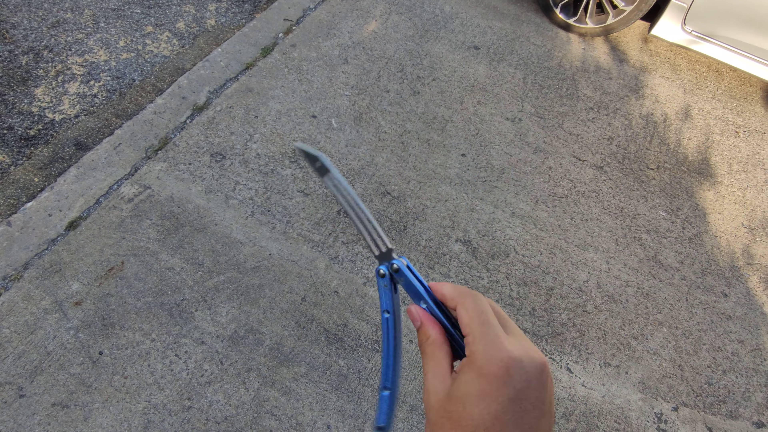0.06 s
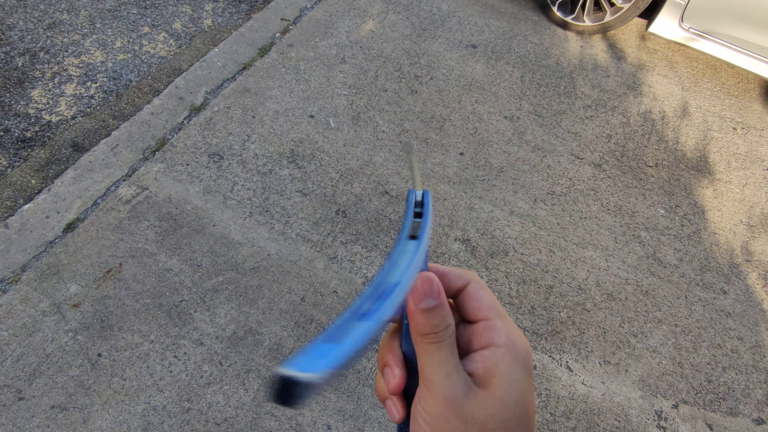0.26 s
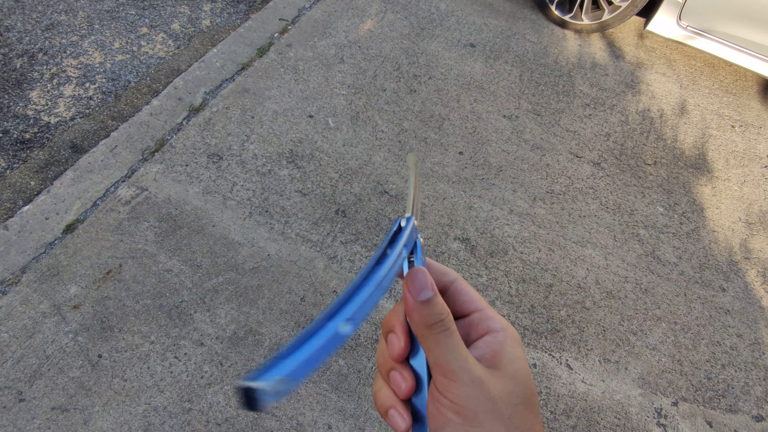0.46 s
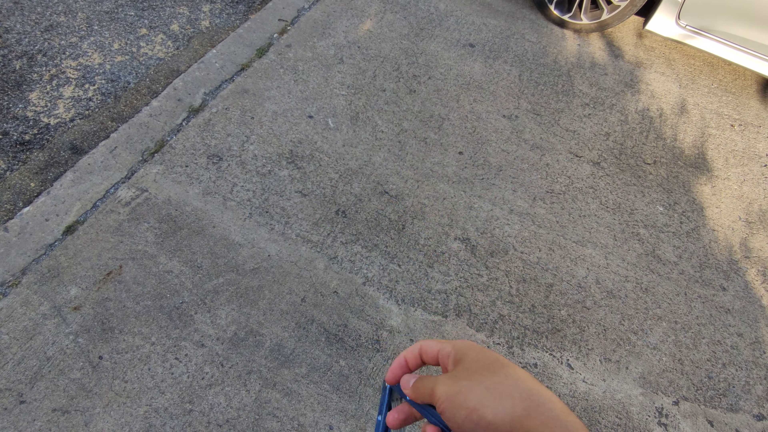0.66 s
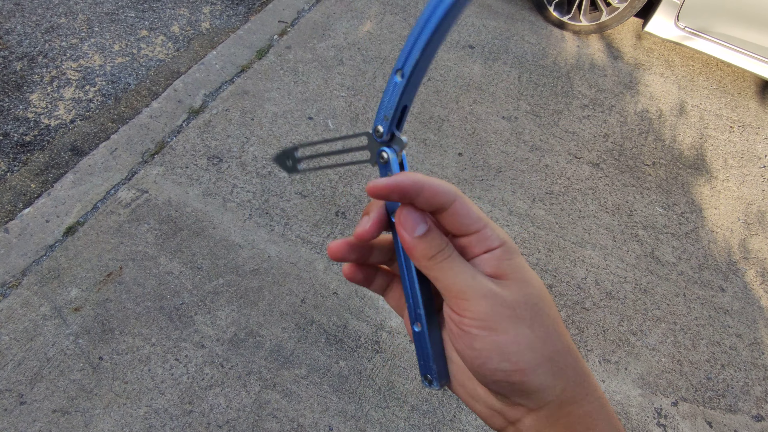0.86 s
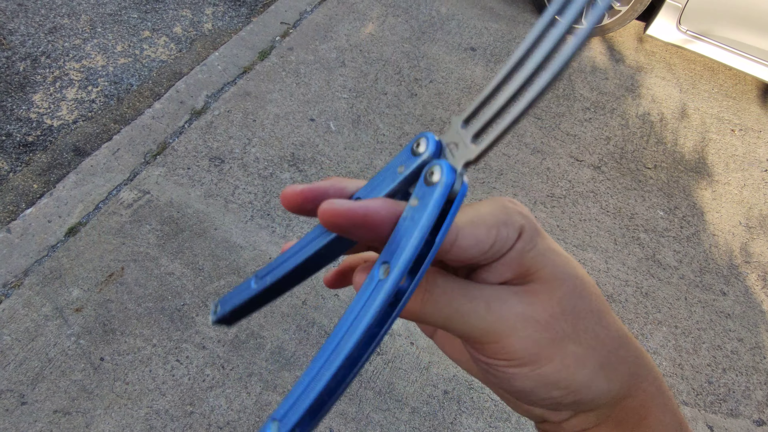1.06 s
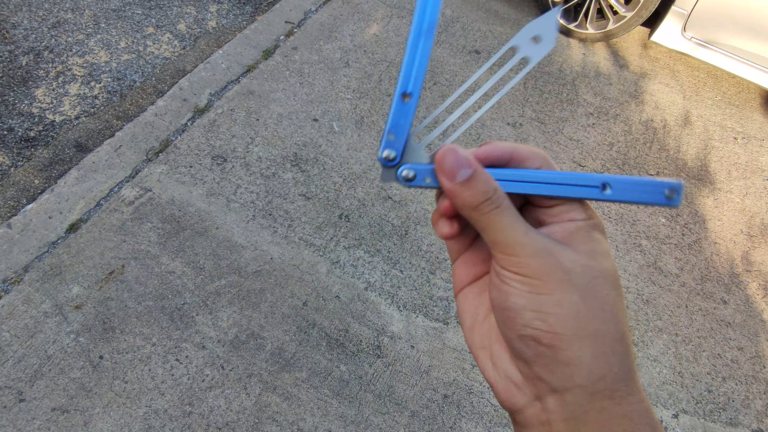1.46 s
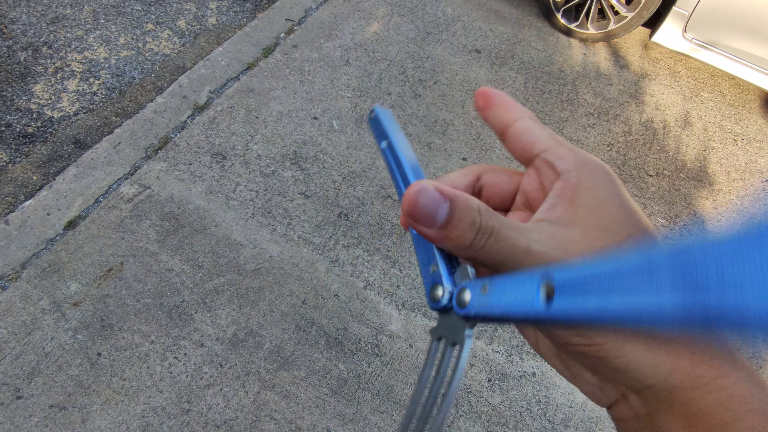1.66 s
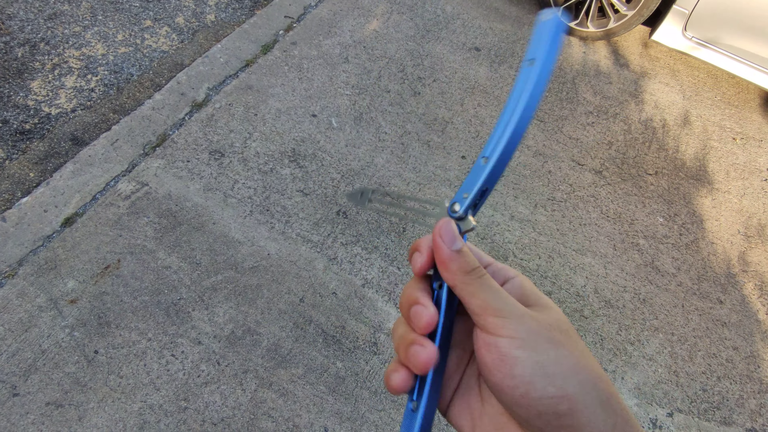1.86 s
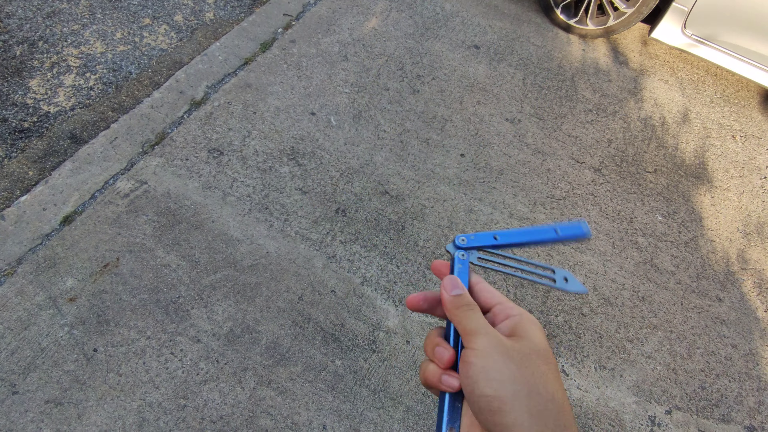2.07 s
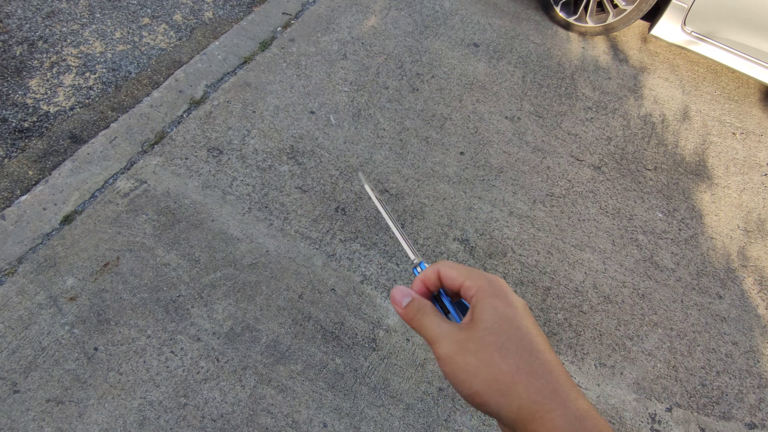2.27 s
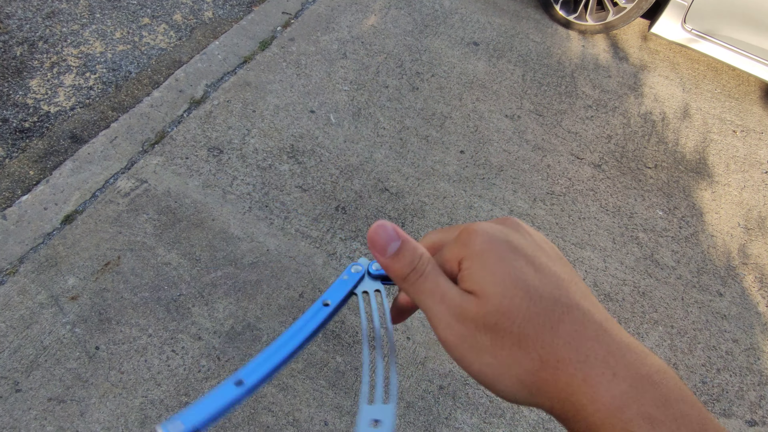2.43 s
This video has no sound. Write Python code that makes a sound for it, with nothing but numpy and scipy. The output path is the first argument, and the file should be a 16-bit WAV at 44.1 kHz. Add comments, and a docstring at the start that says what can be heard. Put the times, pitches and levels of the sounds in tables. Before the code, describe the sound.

Sharp, close clacks come from a practice butterfly knife swung by hand in the open air. After several hits with light ringing, a pass makes a low puff, and more clacks end it. Soft wind rumbles throughout.

```python
"""A butterfly knife trainer is flipped close to the microphone, outdoors, over a low rumble of wind.
For about a second its handles clack on each other and on the pins; hard catches thud in the palm and
the free blade rings on as it swings. A thin hiss swells, and at 1.5 s one pass pushes a puff of air at
the microphone. From 2 s comes a last flurry of clacks with a faint squeak, then the thin hiss falls
away and a softer rush of air comes up."""
import sys
import numpy as np
from scipy import signal
from scipy.fft import rfft, irfft, next_fast_len
from scipy.io import wavfile
from scipy.ndimage import uniform_filter1d, map_coordinates

SR = 44100
rng = np.random.default_rng(int(sys.argv[2]) if len(sys.argv) > 2 else 0)


def generate_wav(signal):
    """Clip the signal to [-1, 1] and save it as 16-bit WAV at the path in sys.argv[1]."""
    frames = np.transpose(np.atleast_2d(signal))
    scaled = np.clip(frames, -1, 1) * 32767
    pcm = np.round(scaled).astype(np.int16)
    wavfile.write(sys.argv[1], SR, pcm)


N = 114660  # 2.6 s


def amp(db):
    """Decibels to gain."""
    return 10 ** (np.asarray(db) / 20)


def unit(x):
    """Scale to rms 1."""
    return x / np.sqrt(np.mean(x ** 2) + 1e-20)


def eq_gain(spectrum, hz):
    """Gain at hz from (Hz, dB) points joined on a log frequency axis."""
    points_hz, points_db = np.transpose(spectrum)
    return amp(np.interp(np.log(hz + 1), np.log(points_hz + 1), points_db))


def fader(points):
    """Gain per sample from (s, dB) points."""
    return amp(np.interp(np.arange(N) / SR, *np.transpose(points)))


def wobble(rate):
    """A smooth random curve, rate knots a second."""
    knots = rng.standard_normal(int(N * rate / SR) + 4)
    return map_coordinates(knots, [np.arange(N) * rate / SR])


def filtered(x, response):
    """Filter x by a gain given as a function of Hz."""
    size = next_fast_len(N + SR // 2)
    return irfft(rfft(x, size) * response(np.fft.rfftfreq(size, 1 / SR)), size)[:N]


def noise(spectrum):
    """Coloured noise of rms 1."""
    return unit(filtered(rng.standard_normal(N), lambda hz: eq_gain(spectrum, hz)))


def impact(spectrum, size=8192):
    """The tightest causal pulse with this spectrum (minimum phase)."""
    cepstrum = irfft(np.log(eq_gain(spectrum, np.fft.rfftfreq(size, 1 / SR))))
    cepstrum[1:size // 2] *= 2
    cepstrum[size // 2 + 1:] = 0
    return irfft(np.exp(rfft(cepstrum)))


def clack(spectrum, t60, rattle_db, pitch=1):
    """One metal impact and its rattle, which is rattle_db stronger and dies in t60 seconds."""
    pulse = impact([(hz * pitch, db) for hz, db in spectrum])
    t = np.arange(len(pulse)) / SR
    rattle = rng.standard_normal(len(t)) * amp(-60 * t / t60)
    hit = rfft(pulse) * (1 + amp(rattle_db) * rfft(rattle / np.linalg.norm(rattle)))
    in_band = irfft(hit * (np.fft.rfftfreq(len(t), 1 / SR) < MIC_EDGE_HZ))
    return irfft(hit) / np.linalg.norm(in_band) * np.sqrt(SR / 2000)  # in-band energy: 0.5 ms at rms 1


# Metal hitting metal. Each row: start in seconds, snap, knock and crack levels in dB,
# snap and knock pitch ratios, low and high ring levels in dB.
CONTACTS = [(0.1477, -30, -43, -35, 1.1, 1.02, -64, -57), (.1503, -21.5, -33, -44, 1.02, 0.91, -58, -56),
            (.1550, -33.5, -40.5, -50, 1.0, 1.0, -55, -59), (.2934, -14.5, -42, -34, .98, 1.4, -55, -48),
            (.2944, -10.5, -27, -20.5, 0.92, 1.2, -36.5, -31),
            (.2968, -22.5, -24.5, -33, 1.1, 1.14, -53, -46),
            (.3008, -34.5, -36.5, -40, 0.7, 1.14, -45.5, -48), (.5060, -65, -71, -75, 1.2, 1.1, -78, -59),
            (.7145, -55, -41.5, -59, 0.72, 1.01, -64, -59), (0.7207, -45.5, -54, -64, 1.03, 1.2, -65, -64),
            (.8358, -21, -35, -43, 1.02, 1.05, -51, -62), (.8420, -40, -54, -49, 1.5, 1.0, -64, -50),
            (1.1024, -26, -29.5, -45, 1.06, 0.91, -62, -45),
            (1.1046, -17, -30.5, -42, 1.07, 1.14, -49, -37),
            (1.115, -33.5, -36, -54, 0.99, 0.9, -50.5, -62), (2.015, -41.5, -52, -63, 1.1, 1.3, -64, -58),
            (2.0806, -20, -26.5, -37, .99, 0.94, -55, -51), (2.0826, -24, -28.5, -47, .98, 0.94, -53, -57),
            (2.0850, -20, -43, -42, .99, 1.3, -53, -52), (2.1158, -35.5, -44, -59, .99, 1.17, -49.5, -51),
            (2.3036, -20, -37, -45, 0.9, 1.2, -51, -58), (2.3055, -14.5, -31, -54, 1.02, 1.04, -36.5, -47),
            (2.317, -35.5, -39, -50, 0.87, 0.91, -55, -43)]
# The colours of a hit: bright snap, mid knock, broad crack. Each row: frequency in Hz, level in dB.
SNAP_EQ = [(3000, -52), (4300, -33.5), (5100, -20.5), (5500, -17.5), (5750, -10), (6150, -1.5),
           (6600, -4.5), (7000, -1.5), (7400, 7), (8000, -5.5)]
KNOCK_EQ = [(150, -31.5), (600, -16.5), (1100, -26), (1600, -20), (1950, -7), (2350, 5), (2750, -3),
            (3250, -7), (3600, -11.5), (4500, -31), (7000, -39)]
CRACK_EQ = [(150, -10), (600, 1), (1100, -7), (1500, -5.5), (1950, -6), (2500, -4.5), (3700, -2.5),
            (4400, -5.5), (5400, 10), (7000, 0.5)]
# Handle modes, damped by the hand. Each row: pitch in Hz, level in dB, 60 dB decay time in seconds.
HANDLE_MODES = [(2290, -3, .09), (2360, 2, .08), (2505, -7, .05), (2710, -6, .055), (2938, -8, .055),
                (3104, -10, .06), (3400, -14, .04), (6872, 1, .06), (7160, -9, .04), (7480, -5, .09)]


def handles():
    """Each contact with a handle or pin snaps, knocks, cracks and briefly rings the handles."""
    out, t = np.zeros(N), np.arange(SR // 4) / SR
    for start, snap_db, knock_db, crack_db, snap_pitch, knock_pitch, low_db, high_db in CONTACTS:
        add(out, start, amp(snap_db) * clack(SNAP_EQ, t60=.01, rattle_db=10.5, pitch=snap_pitch))
        add(out, start, amp(knock_db) * clack(KNOCK_EQ, t60=.0081, rattle_db=4, pitch=knock_pitch))
        add(out, start, amp(crack_db) * clack(CRACK_EQ, t60=.016, rattle_db=10.5))
        for hz, mode_db, t60 in HANDLE_MODES:
            ring_db = (high_db if hz > 5000 else low_db) + mode_db + rng.normal(0, 1)
            detuned_hz = hz * (1 + rng.normal(0, .002))
            add(out, start, amp(ring_db - 60 * t / t60) * np.sin(2 * np.pi * detuned_hz * t))
    return out


# The blade sings after the harder blows. Each row: start in seconds, low and high mode levels in dB,
# seconds until it faces the microphone, half width of that swell in seconds.
BLADE_RINGS = [(.1505, -66, -75, 0.14, 0.059), (.295, -71.5, -53.5, 0.096, 0.062),
               (.836, -80, -71, 0.015, 0.027), (1.1046, -68.5, -73, 0.1, .04),
               (2.3053, -58, -76, 0.14, 0.033)]
BLADE_LOW_HZ, BLADE_HIGH_HZ, BLADE_T60_S = 2248, 6170, 0.95
FACING_LIFT_DB, DOPPLER_HZ = 10.5, 14  # the Doppler waver is that of the high mode


def blade():
    """Two long, wavering modes that swell when the swinging blade turns its flat to the microphone."""
    out, t = np.zeros(N), np.arange(SR) / SR
    for start, low_db, high_db, facing, width in BLADE_RINGS:
        swing_db = FACING_LIFT_DB * np.exp(-((t - facing) / width) ** 2) + 2.6 * wobble(45)[:len(t)]
        doppler_t = t + np.cumsum(DOPPLER_HZ / BLADE_HIGH_HZ * wobble(40)[:len(t)]) / SR
        low = amp(low_db) * np.sin(2 * np.pi * BLADE_LOW_HZ * doppler_t)
        high = amp(high_db) * np.sin(2 * np.pi * BLADE_HIGH_HZ * doppler_t)
        add(out, start, (low + high) * amp(swing_db - 60 * t / BLADE_T60_S))
    return out


# Catches in the palm. Each row: start in seconds, peak level in dB.
CATCHES = [(0.158, -33.5), (.2950, -38), (2.0821, -25.5)]
# Their soft, dark body. Each row: frequency in Hz, level in dB.
PALM_EQ = [(60, -10), (160, -1.5), (330, 1.5), (600, -3.5), (900, -22.5), (2000, -32.5)]


def palm():
    """A hard catch lands as a dull thud in the hand."""
    out, thud = np.zeros(N), impact(PALM_EQ)
    for start, db in CATCHES:
        add(out, start, amp(db) * thud / np.abs(thud).max())
    return out


# Bassy turbulence around the puff. Each row: frequency in Hz, level in dB.
EDDY_EQ = [(30, -23), (60, 6), (120, -17), (270, 2), (420, -25.5), (1000, -46)]


def puff(centre_s=1.5467, centre_hz=124, sag_hz_per_s=17000, push_width_s=.0033, eddy_width_s=.017):
    """The knife sweeps past the microphone: suction, a push, a slower suction, and eddies."""
    t = np.arange(N) / SR - centre_s
    cycles = centre_hz * t - sag_hz_per_s * t ** 2 / 2
    push = np.exp(-(t / push_width_s) ** 2 / 2) * np.cos(2 * np.pi * cycles)
    eddies = np.exp(-(t / eddy_width_s) ** 2 / 2) * noise(EDDY_EQ)
    return amp(-18) * push + amp(-36.5) * eddies


def squeak(start_s=2.09, length_s=.17, from_hz=3740, to_hz=4100, db=-62.5):
    """A thin, unsteady tone that rises as the knife is turned."""
    progress = np.clip((np.arange(N) / SR - start_s) / length_s, 0, 1)
    hz = from_hz + (to_hz - from_hz) * np.sin(progress * np.pi / 2) + 35 * wobble(250)
    swell = np.sqrt(np.abs(np.sin(np.pi * progress)))
    return amp(db) * swell * np.sin(2 * np.pi * np.cumsum(hz) / SR)


def yard(x, db=-20, t60=.097, attack_s=.005):
    """The pavement and nearby walls scatter back a short, weak tail."""
    t = np.arange(SR // 4) / SR
    tail = rng.standard_normal(len(t)) * amp(-60 * t / t60) * (1 - np.exp(-t / attack_s))
    return amp(db) * signal.fftconvolve(x, tail / np.linalg.norm(tail))[:N]


# The wind's rumble. Each row: frequency in Hz, level in dB.
WIND_EQ = [(20, -40.5), (32, -30.5), (42, -10), (52, -7.5), (65, -2), (100, -1.5), (160, -3.5), (300, -1.5),
           (450, -6.5), (650, -13), (1000, -25.5), (1500, -36), (3000, -46), (6000, -83.5)]


def wind(db=-44, sway_db=.5):
    """A bed of low wind whose level sways slightly."""
    return amp(db + sway_db * wobble(8.01)) * noise(WIND_EQ)


# Midrange air, thin hiss and top-end sizzle. Each row: frequency in Hz, level in dB.
AIR_EQ = [(500, -16.5), (1100, -4), (1600, -1), (2250, 0.5), (2750, -5), (3300, -10), (4000, -20.5),
          (6000, -27)]
HISS_EQ = [(1200, -19), (2400, -5.5), (3000, 0.5), (3400, 3), (3750, -3), (4200, -7.5), (4600, -4),
           (5400, -7), (6100, -5), (7500, -3.5)]
SIZZLE_EQ = [(3000, -21.5), (4500, -12.5), (5600, -9), (6150, -1.5), (6500, 3), (7500, -3)]
# Their fader rides. Each row: time in seconds, level in dB.
AIR_RIDE = [(0, -63.5), (.75, -65), (1.0, -59), (1.3, -57.5), (1.45, -65), (2.2, -65.5), (2.47, -66.5),
            (2.55, -55), (2.6, -57)]
HISS_RIDE = [(0, -80.5), (1.2, -79.5), (1.24, -52), (1.42, -49.5), (1.8, -50.5), (2.25, -52), (2.35, -51.5),
             (2.42, -65.5), (2.6, -82)]
SIZZLE_RIDE = [(0, -64.5), (.45, -61.5), (.75, -65.5), (1.0, -59.5), (1.2, -55.5), (1.28, -49.5),
               (1.5, -58), (1.9, -59.5), (2.25, -52), (2.45, -63), (2.6, -56)]


def hiss():
    """Three bands of faint noise come and go, the upper two with a streaky grain."""
    air = fader(AIR_RIDE) * noise(AIR_EQ)
    thin = fader(HISS_RIDE) * streaky(HISS_EQ)
    sizzle = fader(SIZZLE_RIDE) * streaky(SIZZLE_EQ)
    return air + thin + sizzle


def streaky(spectrum, depth_db=3, width_hz=110, life_s=.14, size=1024):
    """Coloured noise of rms 1 with narrow, short-lived resonances."""
    spectrogram = signal.stft(noise(spectrum), nperseg=size)[2]
    bins, frames = round(width_hz * size / SR), round(life_s * SR * 2 / size)
    streaks = uniform_filter1d(rng.standard_normal(spectrogram.shape), bins, axis=0)
    streaks = unit(uniform_filter1d(streaks, frames, axis=1))
    return unit(signal.istft(spectrogram * amp(depth_db * streaks), nperseg=size)[1][:N])


def add(track, start, sound):
    """Mix a sound into the track from start, in seconds."""
    part = track[round(start * SR):][:len(sound)]
    part += sound[:len(part)]


def scene():
    """The knife up close in the open air, in mono; only the handles feed the yard's tail."""
    clacks = handles()
    knife = clacks + yard(clacks) + blade() + palm() + squeak() + puff()
    return (knife + wind() + hiss())[None]


MIC_EDGE_HZ, EDGE_WIDTH_HZ, LEAK_DB, LEAK_TOP_HZ = 7560, 35, -42, 8629


def record(dry):
    """The microphone's band ends at a steep edge, with a trace of leakage just above it."""
    def response(hz):
        passband = (1 - np.tanh((hz - MIC_EDGE_HZ) / EDGE_WIDTH_HZ / 2)) / 2
        return (passband + amp(LEAK_DB)) * (hz < LEAK_TOP_HZ)
    return filtered(dry[0], response)[None]


dry = scene()
out = record(dry)
generate_wav(out)
```